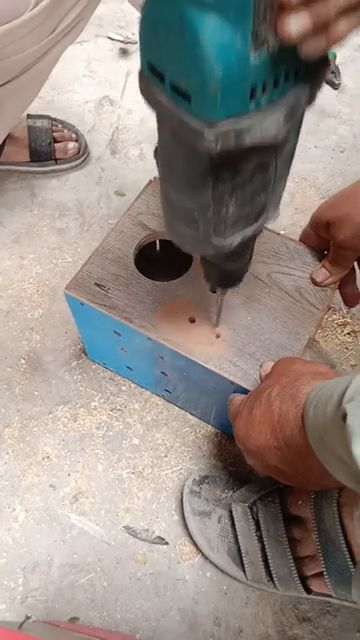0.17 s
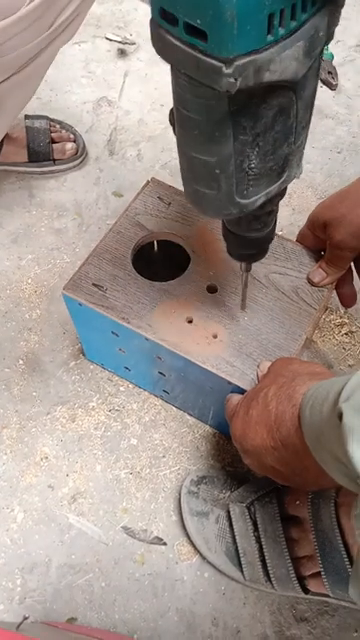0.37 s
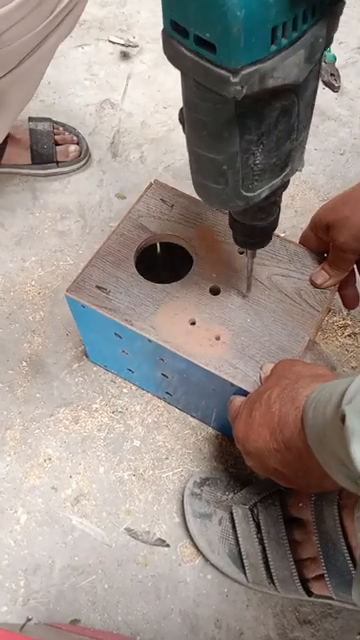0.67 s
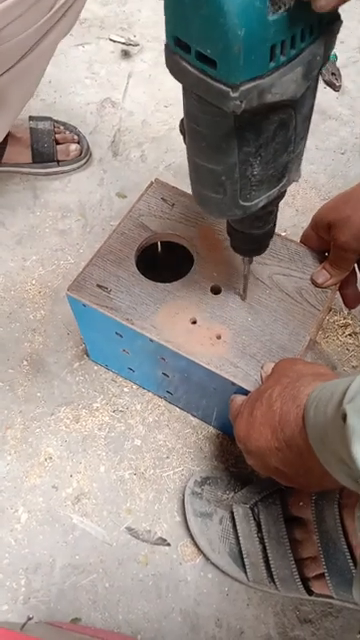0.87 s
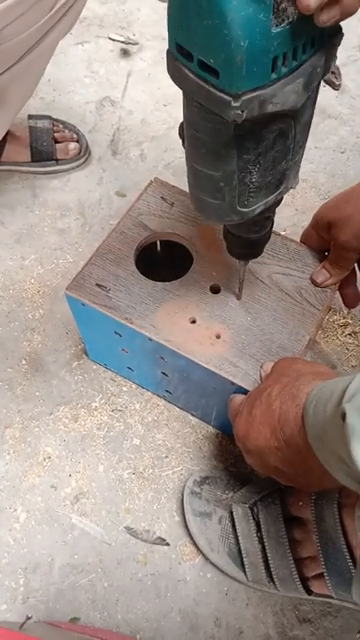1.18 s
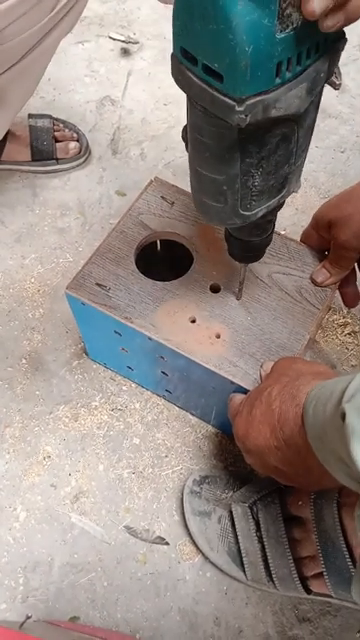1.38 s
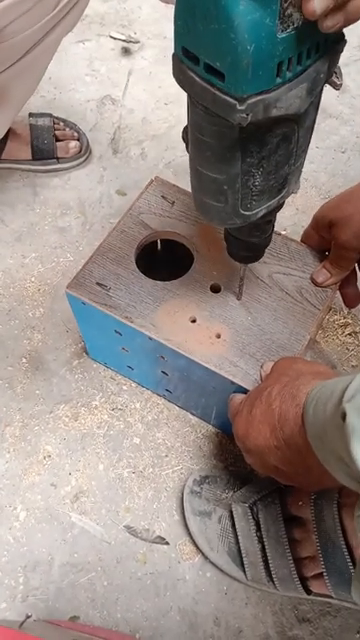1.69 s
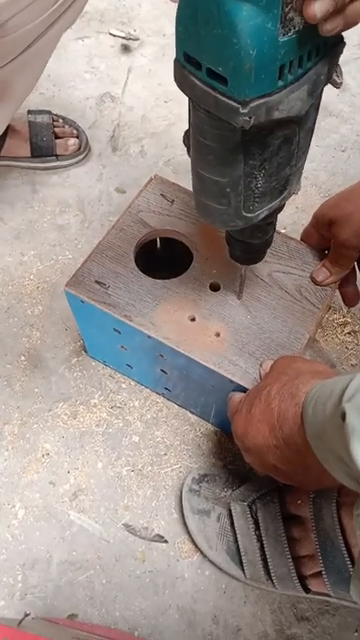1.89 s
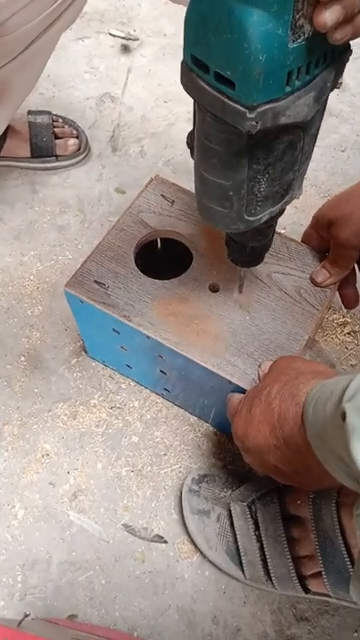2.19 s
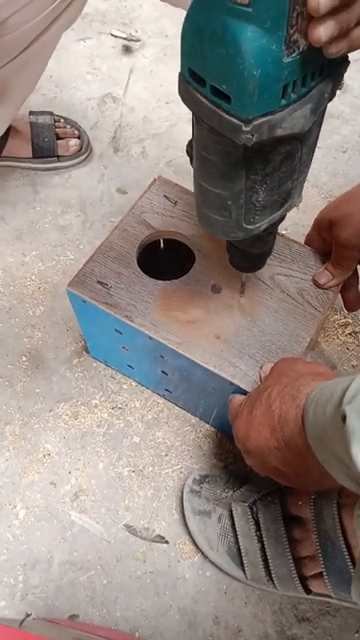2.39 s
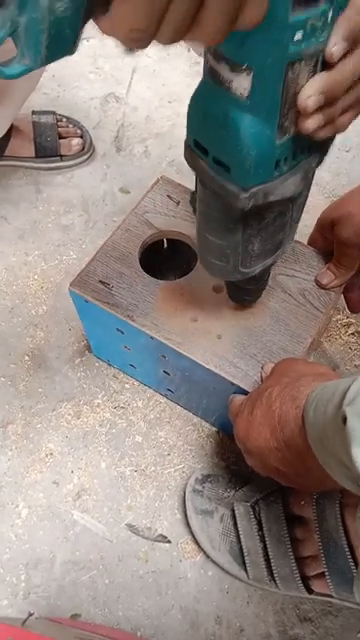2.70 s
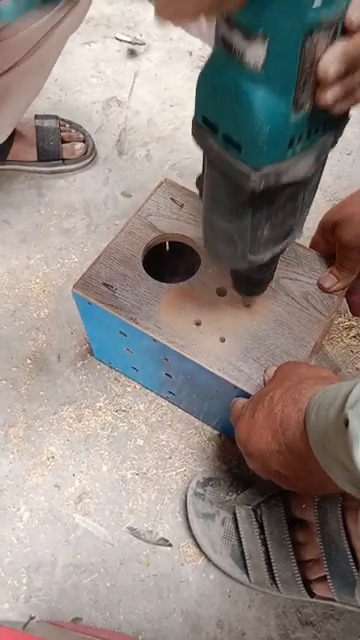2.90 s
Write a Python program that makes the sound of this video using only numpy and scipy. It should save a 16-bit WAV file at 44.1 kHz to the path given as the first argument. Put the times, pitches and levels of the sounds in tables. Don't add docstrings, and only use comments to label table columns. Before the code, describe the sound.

A hammer drill coasts down with a falling gear whine, its slow bit chatters and knocks on a hollow wooden box, then it spins up and hammers loudly through the wood; close phone microphone, short outdoor-like reflections.

```python
import sys
import numpy as np
from scipy import signal
from scipy.fft import rfft, irfft
from scipy.io import wavfile
from scipy.ndimage import uniform_filter1d, minimum_filter1d

SR = 44100
rng = np.random.default_rng(int(sys.argv[2]) if len(sys.argv) > 2 else 0)


def amplitude_ratio(level_db):
    exponent = np.asarray(level_db, float) / 20
    return 10 ** exponent


def to_wav(s):
    ch = np.atleast_2d(s).T
    pcm = np.round(np.clip(ch, -1, 1) * 32767)
    wavfile.write(sys.argv[1], SR, pcm.astype(np.int16))


N = 134505
T = np.arange(N) / SR
TEETH_PER_BLOW = 125.65


def evened(x):
    return x / np.sqrt(np.mean(x ** 2) + 1e-20)


def curve(table, t, column=1):
    columns = np.transpose(table)
    return np.interp(t, columns[0], columns[column])


def wander(hz):
    smooth = uniform_filter1d(rng.standard_normal(N), int(SR / hz / 2))
    return evened(signal.lfilter([1], [1, -np.exp(-2 * np.pi * hz / SR)], smooth))


def ring(x, modes):
    out = np.zeros(N)
    for k, (hz, width, db) in enumerate(modes):
        r = np.exp(-np.pi * width / SR)
        w = 2 * np.pi * hz / SR
        sign = (-1) ** k
        out += sign * amplitude_ratio(db) * signal.lfilter([0, r * np.sin(w)], [1, -2 * r * np.cos(w), r * r], x)
    return out


def grit(clicks, fade_s):
    fade = np.exp(-np.arange(600) / SR / fade_s)
    return signal.oaconvolve(abs(clicks), fade / np.linalg.norm(fade))[:N] * rng.standard_normal(N)


# time_s, tooth_rate_hz
SPEED = [(0, 8882), (.2, 8423), (.338, 8440), (.6, 6830), (.95, 5065), (1.3, 3680), (1.8, 2050),
         (1.93, 2900), (1.965, 5050), (1.985, 5850), (2.02, 6670), (2.096, 7921), (2.17, 8534),
         (2.27, 8856), (2.4, 9060), (2.654, 9170), (2.74, 9756), (2.86, 10020), (3.05, 8532)]


def teeth():
    return np.cumsum(curve(SPEED, T)) / SR


# start_s, strength_db, wood_weight_db, snap_db, hollow_thump_db
LOOSE = [(1.0022, -25, 2, 12, -8), (1.14, -33, 4, 4, 2), (1.1968, -27, 6, 14, 3), (1.2318, -44, 1, 6, 1),
         (1.263, -28, -1, 12, 0), (1.2974, -10, 5, 12.5, 0.5), (1.305, -22, 11, 5, 0),
         (1.3326, -7.5, 7, 18, 8.5), (1.35, -23, 10, 0, 20.5), (1.3661, -12, 8, 17, 6),
         (1.383, -29, 4, 0, 21), (1.4002, -15.5, 8.5, 12, 11), (1.4386, -40, 12, 13, 13),
         (1.474, -45, -3, -1, 8), (1.495, -45, -8, 0, 21), (1.649, -30, 2, 0, 4),
         (1.7919, -2, 5.5, 10.5, 7), (1.825, -32, 11, -4, 21), (1.8783, -17, 7, 15.5, -2),
         (1.9399, -4, 4.5, 10, 5.5), (1.9672, -3.5, 0, 7, 6)]
# time_s, strength_db, wood_weight_db, snap_db
PRESS = [(1.98, -5, 3.5, 6), (2.2, -3.5, 3.5, 3.5), (2.6, -5, 4, 5.5), (2.67, -33.5, 20.5, 19),
         (2.735, -29, 16, 17), (2.755, -8, 1, 4), (2.785, -6, 2.5, 2), (2.81, -10.5, 4.5, 6),
         (2.83, -32, 18, 6), (2.89, -27, 3.5, 20), (2.95, -34.5, 7.5, -8)]
BORING_S = PRESS[0][0] - .02


def blow_clicks():
    count = (teeth() - np.interp(1.9903, T, teeth())) / TEETH_PER_BLOW
    s = np.interp(np.arange(int(count[-1]) + 1), count, T)
    spread_db, jitter_s = 1.3, .0002
    luck = rng.standard_normal((len(s), 4)) * [jitter_s, spread_db, spread_db, 0.82 * spread_db]
    driven = np.c_[s, curve(PRESS, s), curve(PRESS, s, 2), curve(PRESS, s, 3)] + luck
    loose = np.array(LOOSE)
    start_s, strength_db, weight_db, snap_db = np.r_[loose[:, :4], driven].T
    at = np.round(start_s * SR).astype(int)
    steel, wood, edge, thump = np.zeros((4, N))
    steel[at] = amplitude_ratio(strength_db)
    wood[at] = amplitude_ratio(strength_db + weight_db)
    edge[at] = amplitude_ratio(strength_db + snap_db)
    thump[at[:len(loose)]] = amplitude_ratio(loose[:, 1] + loose[:, 4])
    return steel, wood, edge, thump


# pitch_hz, width_hz, level_db
STEEL = [(1890, 376, 2.5), (2780, 500, 2), (3390, 574, 5), (7070, 620, 2.5), (8650, 1540, 0.5)]
# pitch_hz, width_hz, level_db
STRIKER = [(4500, 520, 6.5), (5250, 600, 6.5)]
# pitch_hz, width_hz, level_db
SEAT = [(4900, 1900, -8)]
# pitch_hz, width_hz, level_db
SNAP = [(10500, 2500, -2), (12800, 1300, -3), (14600, 1500, -9)]
# pitch_hz, width_hz, level_db
BOX = [(137, 140, -20.5), (285, 130, -10), (370, 260, 1), (510, 224, 5.5), (720, 500, -28), (795, 570, -27),
       (1000, 200, 6), (1135, 45, -0.5), (1314, 70, -0.5), (1548, 45, -10.5)]
# pitch_hz, width_hz, level_db
LID = [(563, 112, -6.5), (760, 140, -4), (1020, 174, 4), (1160, 143, -3), (1270, 63, -3.5)]
# pitch_hz, width_hz, level_db
PUSH = [(249, 265, 10)]
# pitch_hz, width_hz, level_db
HOLLOW = [(297, 104, -15)]


def hammer():
    steel, wood, edge, thump = blow_clicks()
    free = T < BORING_S
    steel += .4 * np.roll(steel, round(.00176 * SR))
    push = -np.roll(wood, round(.0034 * SR)) * (T > BORING_S)
    rebound = amplitude_ratio(6.0) * np.roll(wood, round(.00395 * SR))
    slow = curve(SPEED, T) < 7000
    wood = wood * amplitude_ratio(7.0 * slow) - rebound
    clank_s, snap_s = .002, .0033
    knock = wood + .22 * grit(wood, clank_s)
    blow = steel + .4 * grit(steel, clank_s)
    clank = ring(grit(steel, clank_s), STEEL) + ring(ring(blow, SEAT), STRIKER)
    snap = ring(grit(edge, snap_s), SNAP)
    box = amplitude_ratio(-3.5) * ring(knock * ~free, BOX) / 2
    lid = ring(knock * free, LID) / 2 + ring(push, PUSH)
    air = ring(ring(thump, HOLLOW), HOLLOW)
    return amplitude_ratio(-1) * clank + amplitude_ratio(-2) * snap + box + lid + air


# time_s, whine_db, roar_db, rubbing_db
MOTOR = [(0, -24, -27, -34), (.3, -28, -28.5, -56), (.45, -28, -29.5, -70), (.6, -24.5, -25.5, -81),
         (.68, -33, -24, -57), (.85, -18, -19.5, -67), (1.03, -30.5, -28, -47), (1.12, -28.5, -24, -35),
         (1.3, -33.5, -25.5, -20.5), (1.36, -31, -22.5, -14.5), (1.6, -46, -33.5, -32.5),
         (1.77, -52, -33, -39.5), (1.83, -62, -32.5, -16.5), (1.97, -37, -32, -29), (2.1, -23, -17.5, -7.5),
         (2.6, -25.5, -18, -16), (2.85, -36.5, -22.5, -20), (3.05, -28.5, -28.5, -44)]
# time_s, level_db
CANCEL = [(.36, 0.5), (.4, -4), (.44, 8), (.475, 0.5), (.53, -1), (.97, 1.5), (1.03, -6.5), (1.09, 10),
          (1.17, -6), (1.3, 5.5), (1.34, -7), (1.41, -18), (1.46, -4.5), (1.93, 3), (1.96, 6), (2, -4),
          (2.08, -1), (2.2, -1.5)]
# multiple, level_db
OVERTONES = [(4, -18), (5, -17), (6, -16), (7, -13), (8, -5)]
# share_of_tooth_rate, resonance_hz, width_hz, level_db
SIDE_LINES = [
    (.835, 3350, 110, -36),
    (1.57, 3900, 90, -40),
]


def whine():
    hz = curve(SPEED, T)
    turns = teeth() + np.cumsum(21.8 * wander(184)) / SR
    tone_db = curve(MOTOR, T) + curve(CANCEL, T) + 4.5 + 2.5 * wander(19)
    out = amplitude_ratio(tone_db) * np.sin(2 * np.pi * turns)
    for k, db in OVERTONES:
        level = amplitude_ratio(-51) * amplitude_ratio(db + 3.4 * wander(28))
        out += level * np.sin(2 * np.pi * k * turns) * (k * hz < 16000)
    slowing = np.gradient(hz) < 0
    for k, at_hz, width, db in SIDE_LINES:
        nearness = np.exp(-((k * hz - at_hz) / width) ** 2)
        out += amplitude_ratio(db) * nearness * np.sin(2 * np.pi * k * turns) * slowing
    return out


# time_s, rasp_db, breakthrough_db
BORE = [(1.96, -60, -60), (2.03, -20.5, -23), (2.5, -14.5, -16), (2.6, -20, -10), (2.65, -27, -12),
        (2.71, -49, -36), (2.77, -18, -17), (2.82, -22, -19), (2.92, -47, -43)]
# pitch_hz, width_hz, level_db
RASP = [(1056, 75, 10), (1010, 160, 13.5), (2020, 230, 7), (2690, 430, 13), (3280, 260, 9.5)]
# pitch_hz, width_hz, level_db
BREAK = [(297, 27, 5), (510, 56, 0), (640, 44, 5), (820, 100, 8)]


def boring():
    tear = amplitude_ratio(2 * wander(52)) * rng.standard_normal((2, N))
    rasp = amplitude_ratio(curve(BORE, T)) * evened(ring(tear[0], RASP))
    breaking = amplitude_ratio(curve(BORE, T, 2)) * evened(ring(tear[1], BREAK))
    return (T > BORE[0][0]) * (rasp + breaking)


# time_s, pitch_hz, level_db
GROAN = [(1.8, 328, -31), (1.83, 333, -18), (1.847, 345, -13), (1.865, 319, -23), (1.88, 323, -30),
         (1.895, 370, -27), (1.91, 403, -23), (1.928, 378, -11), (1.945, 320, -50)]
# pitch_hz, width_hz, level_db
RUB = [(285, 91, 5.5), (343.5, 47, 3.5), (398, 42, -1), (840, 71, 0), (1340, 140, -2.5)]


def rubbing():
    cycles = np.cumsum(curve(GROAN, T) + 15 * wander(98)) / SR
    groan = amplitude_ratio(curve(GROAN, T, 2) + wander(43)) * np.sin(2 * np.pi * cycles)
    groaning = (T > GROAN[0][0]) * (T < GROAN[-1][0])
    chatter = amplitude_ratio(curve(MOTOR, T, 3) + 2.2 * wander(23.3)) * evened(ring(rng.standard_normal(N), RUB))
    return groan * groaning + chatter


# pitch_hz, level_db
ROAR = [(60, -17), (250, -11), (420, -17), (900, 1), (2050, -5.5), (2400, -3.5), (7500, -4.5),
        (16000, -37.5)]
# pitch_hz, width_hz, level_db
HOUSING = [(884, 370, 2.5), (1398, 186, 1), (1986, 92, -2.5), (3690, 410, 0.5), (5170, 740, 2.5),
           (7190, 560, 4), (13100, 900, -9)]


def roar():
    hz = np.fft.rfftfreq(N, 1 / SR)
    pitch_hz, level_db = np.transpose(ROAR)
    colour = amplitude_ratio(np.interp(np.log(hz + 1), np.log(pitch_hz), level_db))
    tick_level = amplitude_ratio(1.5 * np.minimum(rng.exponential(1, N), 4))
    ticking = rng.random(N) < 700 / SR
    ticks = evened(tick_level * ticking * rng.choice([-1., 1.], N))
    air = evened(irfft(rfft(rng.standard_normal(N) + .5 * ticks) * colour, N))
    body = evened(ring(ticks + 0.94 * rng.standard_normal(N), HOUSING))
    throb = 1 + 0.14 * np.cos(2 * np.pi * teeth() / TEETH_PER_BLOW)
    return amplitude_ratio(curve(MOTOR, T, 2) + 1.24 * wander(52.0)) * throb * evened(air + amplitude_ratio(-2) * body)


# delay_s, level_db
ECHOES = [(.00178, -24), (.0041, -20.5), (.009, -25.5)]


def yard(x):
    taps = np.zeros(SR // 2)
    at = np.arange(500, SR // 2 - 20, 20) + rng.integers(0, 20, (SR // 2 - 501) // 20)
    taps[at] = rng.choice([-1., 1.], len(at)) * amplitude_ratio(-60 * at / SR / 0.06)
    taps *= amplitude_ratio(-15) / np.linalg.norm(taps)
    taps[0] = 1
    for s, db in ECHOES:
        taps[round(s * SR)] += amplitude_ratio(db)
    return signal.fftconvolve(x, taps / np.linalg.norm(taps))[:N]


def scene():
    drill = hammer() + whine() + boring() + rubbing() + roar()
    return np.tile(yard(drill), (2, 1))


# start_s, cut_hz
LOW_CUT = [(0, 148), (.5, 218), (.8, 320), (.98, 285), (1.131, 173), (1.54, 200), (1.785, 173), (1.962, 76),
           (2.61, 180), (2.752, 91), (2.772, 153)]


def low_cut(x):
    out = np.zeros(N)
    for (s, cut_hz), (end, _) in zip(LOW_CUT, LOW_CUT[1:] + [(9, 0)]):
        on = uniform_filter1d(((T >= s) & (T < end)) * 1., size=400)
        leak = amplitude_ratio(-32) * signal.lfilter([1, -1], [1, -.997], x)
        steep = signal.butter(6, cut_hz, "high", fs=SR, output="sos")
        out += on * (leak + signal.sosfilt(steep, x))
    return out


def gain_control(x):
    recover_db_s, knee_db, squeeze, ceiling = 515, -19, .55, 1.3
    half = round(0.01 * SR / 2)
    power_db = 10 * np.log10(abs(uniform_filter1d(x ** 2, size=200)) + 1e-12)
    fall = T * recover_db_s
    held_db = np.maximum.accumulate(power_db + fall) - fall
    over_db = np.maximum(held_db - knee_db, 0)
    ahead_db = -minimum_filter1d(-over_db, 2 * half + 1, origin=-half)
    y = x / amplitude_ratio(squeeze * uniform_filter1d(ahead_db, size=200))
    return ceiling * np.tanh(y / ceiling)


# pitch_hz, level_db
MIC = [(8300, 0), (9200, -8), (11000, -7.5), (15400, 4.5), (15800, -30), (17000, -40)]


def microphone(x):
    hz = np.fft.rfftfreq(N, 1 / SR)
    return irfft(rfft(x) * amplitude_ratio(np.interp(hz, *np.transpose(MIC))), N)


def roll_off(x):
    return signal.sosfilt(signal.butter(12, 16680, fs=SR, output="sos"), x)


def record(dry):
    mix = np.tile(gain_control(microphone(low_cut(dry[0]))), (2, 1))
    return roll_off(mix)


dry = scene()
out = record(dry)
to_wav(out)
```